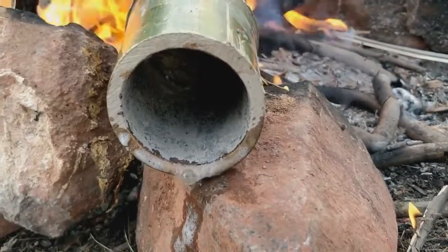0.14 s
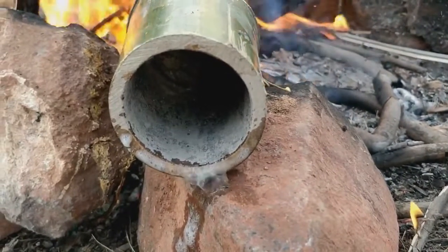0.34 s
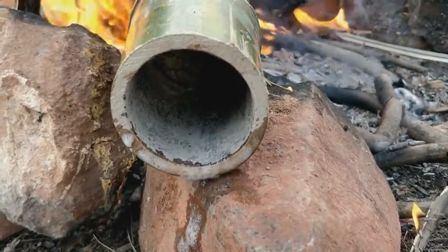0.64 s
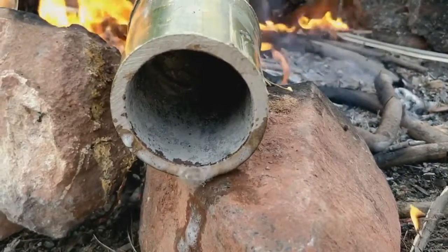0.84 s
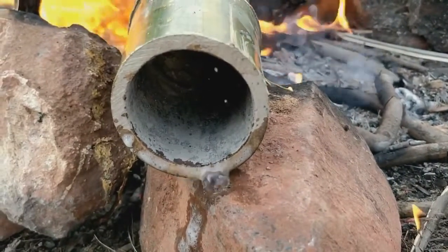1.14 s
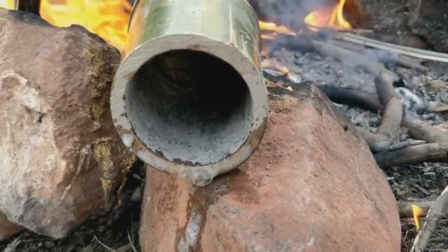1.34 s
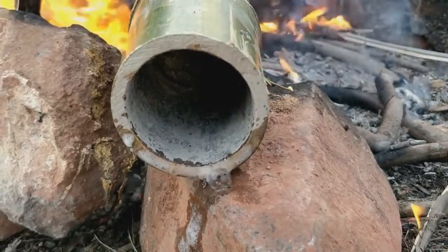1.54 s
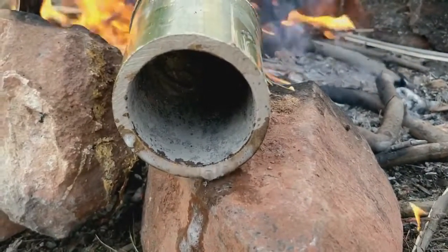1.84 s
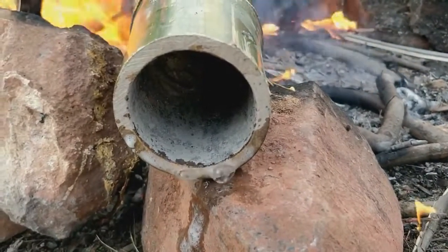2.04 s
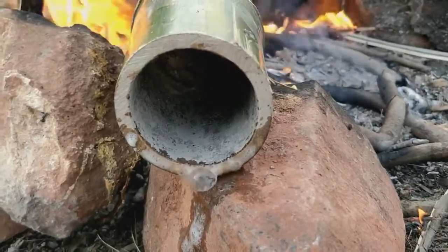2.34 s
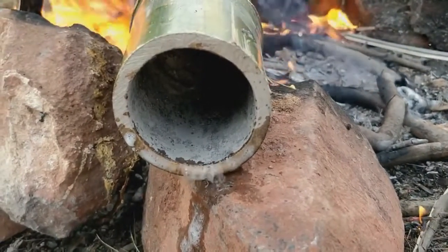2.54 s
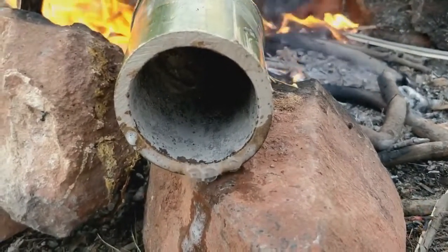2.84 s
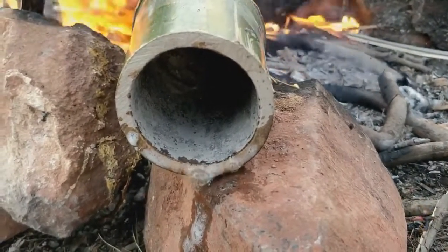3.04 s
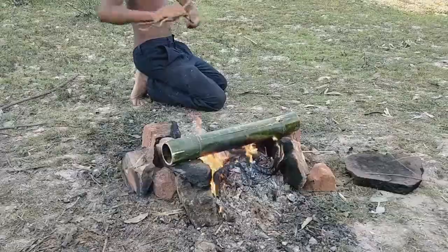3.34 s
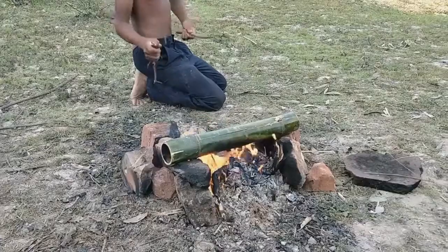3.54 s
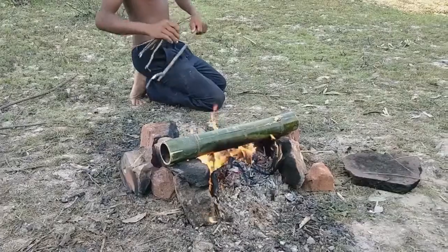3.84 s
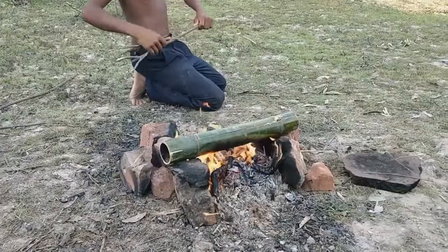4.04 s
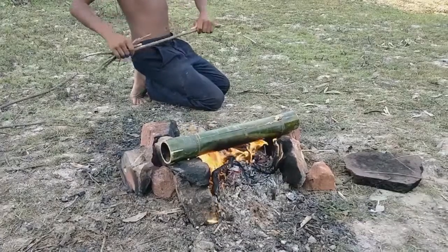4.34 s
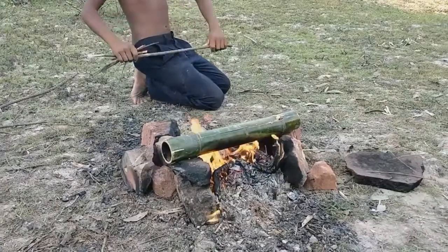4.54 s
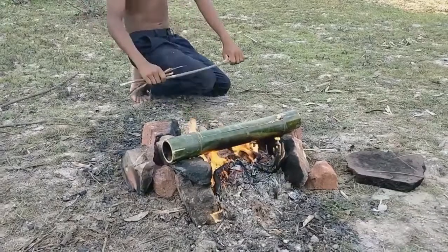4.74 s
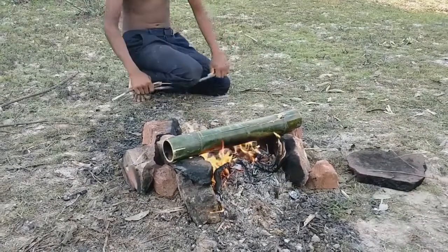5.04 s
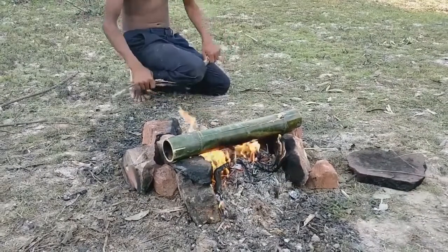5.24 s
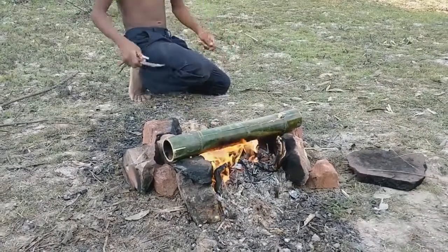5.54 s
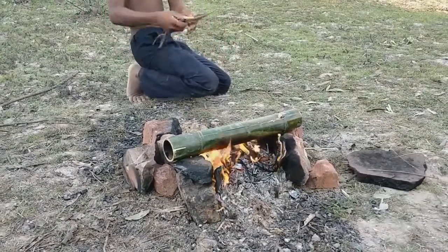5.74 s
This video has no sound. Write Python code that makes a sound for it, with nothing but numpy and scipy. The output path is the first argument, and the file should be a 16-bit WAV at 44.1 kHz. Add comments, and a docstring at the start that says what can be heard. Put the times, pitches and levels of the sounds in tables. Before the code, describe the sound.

A wet tube hisses steadily over a fluttering wood fire; after a tiny silence, faint hiss, wind bumps and crisp stick cracks outdoors.

```python
"""A green bamboo tube lies across a wood fire outdoors. At first we are close to its mouth: steam hisses out as
smooth coloured noise, flames flutter as dense random puffs and sap sizzles as tiny bursts, spitting twice. A
light breeze slowly picks up. After a very short silence the scene changes and the fire is heard from a few
steps away: a faint hiss and a low drone, with gusts and dull bumps of wind on the microphone. Dry sticks are
snapped for fuel, each crack a quick burst of noise with a ring, a woody tone and a tail of echoes; bark rustles
beside them."""
import sys
import numpy as np
from scipy import signal
from scipy.fft import rfft, irfft, next_fast_len
from scipy.io import wavfile
from scipy.ndimage import uniform_filter1d

SR = 44100
rng = np.random.default_rng(int(sys.argv[2]) if len(sys.argv) > 2 else 0)


def to_wav(sig):
    """Store sig (one row per channel, or 1-D mono) as 16-bit WAV at the path in sys.argv[1].

    Samples outside -1..1 are clipped; the rate is SR.
    """
    pcm = np.clip(np.atleast_2d(sig), -1, 1) * 32767
    pcm = np.round(pcm).astype(np.int16)
    wavfile.write(sys.argv[1], SR, pcm.T)  # frames by channels


N = 259735
TIME = np.arange(N) / SR
SIZE = next_fast_len(N)
FREQ = np.maximum(np.fft.rfftfreq(SIZE, 1 / SR), 1)  # never 0, so its logarithm exists


# resonances of the steam hiss, levels relative to each other:
# centre_hz, width_hz, level_db, left_over_right_db, left_lead_radians, left_right_likeness (0-1)
STEAM_RESONANCES = [(2280, 3280, -14.6, 0.4, -2.3, 0.5), (2700, 520, -11.3, -7.5, -0.6, 0.35),
                    (3920, 450, -6.2, -2.3, -2.5, 0.41), (4600, 650, 0.0, 0.0, 3.1, 0.99),
                    (5640, 710, -1.5, 0.9, 2.9, 0.99), (6150, 800, -6.7, -6.7, 0.6, 0.7),
                    (7590, 1030, -6.6, -0.5, 2.5, 0.26), (9000, 930, -10.3, -0.8, 0.2, 0.99),
                    (10090, 1550, -7.3, 6.9, -0.8, 0.27), (11120, 540, -9.0, 18.3, -3.0, 0.29),
                    (12390, 1760, -10.8, 3.3, -0.7, 0.03), (14800, 1760, -13.0, -2.3, 3.5, 0.03)]
# narrow dips in the hiss: centre_hz, width_hz
STEAM_DIPS = [(5046, 270), (7125, 235), (8320, 265)]
# bands where the left and right noise are set in opposite phase: centre_hz, width_hz, share (0-1)
OPPOSITE_PHASE_BANDS = [(3310, 280, 0.96), (4850, 1360, 1)]
# the flow of steam wavers: time_s, level_change_db, extra_change_of_the_sharp_edge_db
STEAM_FLOW = [(0.0, -0.5, -0.5), (0.36, 0.5, -2.5), (0.42, -3, -2), (0.47, -0.5, -2), (0.63, -0.3, 1),
              (1.1, 0, -0.5), (1.17, 0, -6), (1.25, 0.5, -1), (1.63, 0, -2), (1.72, 0.3, 0),
              (2.2, 1.5, 0.5), (2.3, 0.5, -4), (2.52, -0.5, -2.5), (2.65, 0.5, -1.5), (3.15, -0.5, 3)]


def steam(level_db=-34.0, edge_hz=(6700, 8900)):
    """The jet of vapour is smooth noise coloured by broad resonances, each with its own left-right balance."""
    columns = np.array(STEAM_RESONANCES).T[:, :, None]
    hz, width_hz, band_db, pan_db, lead, alike = columns
    power = from_db(band_db) ** 2 / (1 + ((FREQ - hz) / width_hz) ** 2 / np.e) ** 8
    for dip_hz, dip_width_hz in STEAM_DIPS:
        power = power * (1 - .97 / (1 + (2 * (FREQ - dip_hz) / dip_width_hz) ** 2))
    left = np.sqrt((power * from_db(pan_db)).sum(0))
    right = np.sqrt((power * from_db(-pan_db)).sum(0))
    # the angle of the likeness holds the lead of the left ear
    likeness = (power * alike * np.exp(-1j * lead)).sum(0) / (left * right + 1e-20)
    for centre_hz, span_hz, share in OPPOSITE_PHASE_BANDS:
        opposed = np.clip(share, 0, 1) / (1 + (2 * (FREQ - centre_hz) / span_hz) ** 16)
        likeness = likeness * (1 - opposed) - opposed
        # these bands are also set more equally loud on both sides
        left, right = left + opposed * (right - left) / 2, right + opposed * (left - right) / 2
    flow_db, edge_db = in_time(STEAM_FLOW)
    flicker_db = .5 * drift(25)
    hiss = mottled(stereo_noise(left, right, likeness), patchy_db=3.2, patch_hz=220)
    return from_db(level_db + flow_db + flicker_db) * lifted(hiss, edge_hz, "band", edge_db)


def mottled(x, patchy_db, patch_hz, size=1024):
    """Make a sound flicker in narrow, short-lived patches of the spectrum."""
    _, _, spectra = signal.stft(x, nperseg=size)
    rough = rng.standard_normal(spectra.shape[1:])
    bins = max(1, round(patch_hz * size / SR))
    patches = rms_one(uniform_filter1d(rough, bins, axis=0))
    _, patched = signal.istft(spectra * from_db(patchy_db * patches), nperseg=size)
    return rms_one(patched[:, :N])


# how hard the fire burns: time_s, flutter_level_db (before the trim in flames)
FLAME = [(0.0, -45.5), (0.2, -49.5), (0.3, -39.5), (0.345, -59), (0.48, -58), (0.56, -43), (0.64, -49.5),
         (0.74, -47), (1.05, -46), (1.27, -41.5), (1.38, -46.5), (1.58, -47), (1.655, -38), (1.74, -52.5),
         (2.07, -48), (2.15, -40.5), (2.24, -49), (2.52, -43.5), (2.68, -39.5), (2.76, -47.5),
         (3.23, -46.5)]
# the strongest flares: time_s, flutter_peak_db, low_thump_peak_db (both before the trims in flames)
FLARES = [(0.028, -32, -46), (0.123, -31.5, -40), (0.301, -30.5, -39), (0.745, -33, -47),
          (0.83, -27.5, -51), (0.895, -30, -45), (0.931, -30.5, -42), (1.108, -31.5, -37),
          (1.232, -36, -32), (1.274, -28.5, -36), (1.431, -29, -44), (1.494, -26.5, -49), (1.542, -29, -54),
          (1.771, -31.5, -36.5), (1.836, -32, -49), (1.921, -31.5, -49), (2.014, -27.5, -45),
          (2.68, -28.5, -42), (2.769, -33, -34), (2.875, -33, -55), (3.07, -58, -28)]
# colour of the low roar: pitch_hz, relative_level_db (per Hz)
ROAR = [(30, -3), (70, -6), (130, -1), (330, -2.5), (420, -4.5), (600, -27), (2500, -62)]
# colour of the flutter: pitch_hz, relative_level_db (per Hz)
FLUTTER = [(150, -14.5), (280, -3.5), (390, 0), (560, -3), (740, -3), (950, -7), (1150, -15), (4500, -54)]


def flames(flutter_trim_db=2.0, flare_trim_db=-6.0, thump_trim_db=-1.5, roar_db=-45.0, roar_follows=0.17,
           roar_swing_db=3.0, flutter_swing_db=4.0, brightens=.3, bright_hz=750, lag_s=.0001):
    """Burning gas makes a low roar and a dense flutter that tears off for moments, leaps with each flare
    and brightens as it grows."""
    vigour_db, = in_time(FLAME)
    surge_db = vigour_db - vigour_db.mean()
    s, peaks_db, thumps_db = np.transpose(FLARES)
    turbulence = drift(24.3)
    low_db = roar_db + roar_follows * surge_db + roar_swing_db * turbulence
    low_power = from_db(low_db) ** 2 + swells(s, thumps_db + thump_trim_db, rises_s=0.006)
    # the cap lets the flutter fall further than it rises
    mid_db = vigour_db + flutter_trim_db + flutter_swing_db * np.minimum(turbulence, .5)
    mid_power = from_db(mid_db) ** 2 + swells(s, peaks_db + flare_trim_db, rises_s=0.0053)
    flutter = puffs(FLUTTER, per_s=4000, spread_db=0)
    flutter = lifted(flutter, bright_hz, "high", brightens * surge_db)
    roar = puffs(ROAR, per_s=1200, spread_db=3.0)
    fire = np.sqrt(low_power) * roar + np.sqrt(mid_power) * flutter
    # the fire lies a little to the left, so the right ear hears it later
    later = np.interp(TIME - lag_s, TIME, fire)
    return panned(1.8) * np.array([fire, later])


# sap spits on the hot wall of the tube: time_s, peak_db, swell_s
SPITS = [(1.222, -48, 0.026), (2.145, -46.5, 0.02)]
# colour of the sizzle: pitch_hz, relative_level_db (per Hz)
SIZZLE = [(800, -17), (1400, 2), (2700, 4.5), (4300, -42)]


def sizzle(steady_db=-56):
    """Tiny blisters of sap burst all the time, and far harder when it spits."""
    power = from_db(steady_db) ** 2 + swells(*np.transpose(SPITS))
    return np.sqrt(power) * puffs(SIZZLE, per_s=700, spread_db=6.0)


# cracks of dry wood: time_s, peak_db (before the trim in cracks), ring_hz, ring_db, brightness_db,
# time_to_fall_60_db_s, woody_tone_hz, woody_tone_db, scattered_tail_db
CRACKS = [(3.362, -24, 4170, -7, 7, 0.018, 1760, -23, -22), (3.4010, -7, 4200, -7, -1, .007, 330, -17, -22),
          (3.4031, -10, 3000, -3, -5, 0.008, 1760, -18, -22),
          (3.4132, -21, 10400, 3, 7, 0.017, 3400, -11, -17),
          (3.419, -15, 10440, 3, -8, 0.009, 510, -10, -22), (3.4217, -29, 3370, -8, -4, 0.037, 300, 1, -24),
          (4.0478, -33.5, 1900, -2, -24, 0.03, 4060, -3, -7),
          (5.104, -38.5, 3240, -10, 5, 0.1, 2900, -20, -16),
          (5.2848, -7, 7560, -8, 0, 0.009, 770, -17, -14), (5.2863, -6, 8200, -8, 2, 0.007, 360, -19, -14),
          (5.291, -26, 4400, -13, 15, 0.03, 1750, -8, -16),
          (5.303, -15, 10400, -12, 4, 0.027, 1770, -16, -9),
          (5.3182, -15.5, 3400, -2.5, 4, 0.021, 2350, -17, -16),
          (5.3333, -34, 550, 4, -6, 0.019, 530, 4.5, -8),
          (5.856, -42.5, 1690, -4, -18, 0.069, 1220, -2, -16)]
# colour of splitting wood, also used by the rustles: pitch_hz, relative_level_db (per Hz)
WOOD = [(120, -20), (400, -5), (750, -9), (1200, -6), (2500, -2), (4000, 1.5), (5300, 0), (8000, 4),
        (12000, 4), (15500, -12)]
# far sounds favour the left ear in the treble, the far hiss too: pitch_hz, left_over_right_db
FAR_BALANCE = [(1200, 2.5), (2000, 0.5), (7000, -0.5), (9500, 5.5), (11500, 16.5), (14500, -2)]


def cracks(ring_width_hz=800, bright_hz=5000, ragged_db=2.0, likeness=0.59, trim_db=-8.0, build_share=0.038,
           body_t60_s=0.021, size=8192):
    """Each crack is a volley of tearing fibres that builds, dies quickly and rings one resonance of the stick."""
    direct, outward = np.zeros((2, 2, N + size))
    age = np.arange(size) / SR
    hz = np.maximum(np.fft.rfftfreq(size, 1 / SR), 1)
    alike, ears = np.clip(likeness, 0, 1), panned(at_hz(FAR_BALANCE, hz))
    for s, peak_db, ring_hz, ring_db, bright_db, t60_s, body_hz, body_db, tail_db in CRACKS:
        ragged = from_db(ragged_db * rng.standard_normal(size))
        mid, side = rng.standard_normal((2, size)) * ragged
        both = np.sqrt(1 + alike) * mid + np.sqrt(1 - alike) * side * [[1], [-1]]
        fibres = ears * rfft(both)
        colour_db = at_hz(WOOD, hz) + bright_db / (1 + (bright_hz / hz) ** 4)
        tear = irfft(fibres * from_db(colour_db))
        ring = irfft(fibres / (1 + (2 * (hz - ring_hz) / ring_width_hz) ** 2))
        # longer volleys also take longer to build
        build = 1 - np.exp(-(age / (build_share * t60_s)) ** 2)
        shape = build * from_db(-60 * age / t60_s)
        volley = rms_one(rms_one(tear * shape) + from_db(ring_db) * rms_one(ring * shape))
        volley = volley * np.sqrt(np.mean(shape ** 2)) / shape.max()
        # the released piece bends back and forth with a brief woody tone
        body = from_db(body_db - 60 * age / body_t60_s) * np.sin(2 * np.pi * body_hz * age)
        crack = from_db(peak_db + trim_db) * (volley + body)
        start = round(s * SR)
        direct[:, start:start + size] += crack
        outward[:, start:start + size] += from_db(tail_db) * crack
    return direct[:, :N] + clearing(outward[:, :N])


def clearing(x, dull_hz=8000, build_s=0.00089, echoes_per_s=700, diffuse=0.12, t60_s=.23):
    """Ground and bushes scatter a short, duller tail of many separate echoes."""
    age = TIME[:SR // 2]
    echoes = diffuse + (rng.random((2, len(age))) < echoes_per_s / SR)
    fade = from_db(-60 * age / t60_s) * (1 - np.exp(-age / build_s))
    scatter = echoes * rng.standard_normal((2, len(age))) * fade
    dulling = signal.butter(1, min(dull_hz, .45 * SR), fs=SR, output="sos")
    scatter = signal.sosfilt(dulling, scatter)
    scatter /= np.sqrt(np.sum(scatter ** 2, axis=1, keepdims=True))
    return signal.fftconvolve(x, scatter, axes=1)[:, :N]


# bark and splinters rub as a stick is bent: time_s, peak_db, swell_s
RUSTLES = [(3.349, -48, 0.003), (4.035, -56.5, 0.02), (5.317, -46, 0.014), (5.83, -53.5, 0.011)]


def rustles(dull_hz=7000):
    """Rubbing bark and splinters make a fine crackle of random grains, different in each ear."""
    grains = np.array([puffs(WOOD, per_s=750, spread_db=5.0) for ear in range(2)])
    dulling = signal.butter(2, min(dull_hz, SR / 2 - 1), fs=SR, output="sos")
    dull = signal.sosfilt(dulling, grains)
    return np.sqrt(swells(*np.transpose(RUSTLES))) * rms_one(dull)


# the breeze at the microphone: time_s, level_db (before the trim in gusts), left_over_right_db
WIND = [(3.34, -50, 11), (3.42, -48, 4), (3.48, -51.5, 7), (3.76, -49, 11), (3.81, -48, -8),
        (4.08, -49.5, 18), (4.14, -53, 16), (4.9, -65, 8), (5.05, -57, 5), (5.27, -67.5, 7),
        (5.82, -51.5, -6), (5.88, -43, -23)]


def gusts(trim_db=3.5):
    """The breeze swells, drops and veers between the left and right ports of the microphone."""
    level_db, side_db = in_time(WIND)
    return panned(side_db) * wind(level_db + trim_db, lumps_db=3.5)


# colour of wind on the microphone: pitch_hz, relative_level_db (per Hz)
BUFFET = [(15, -4.5), (50, -2), (110, -2.5), (170, -10), (250, -21), (900, -71)]


def wind(level_db, lumps_db, eddies_hz=20):
    """Eddies buffet each microphone port: low noise, mostly separate, with its own uneven level at each port."""
    colour = from_db(at_hz(BUFFET))
    eddies = np.array([drift(eddies_hz), drift(eddies_hz)])
    ports = stereo_noise(colour, colour, likeness=.2)
    return from_db(level_db + lumps_db * eddies) * ports


# dull bumps on the microphone: time_s, peak_db (before the trim in bumps), pitch_hz, left_over_right_db
BUMPS = [(4.014, -37, 70, 17), (4.074, -28, 60.3, 20), (4.981, -33.5, 85.5, 18), (5.627, -32, 60, -22),
         (5.776, -29, 128, -22), (5.869, -23.5, 149, -30)]


def bumps(rise_s=0.0036, trim_db=-4.5):
    """A single large eddy pushes on a port: a heavily damped low swing."""
    age = TIME[:SR // 8]
    out = np.zeros((2, N + SR // 8))
    for s, peak_db, hz, pan_db in BUMPS:
        shape = age / rise_s * np.exp(1 - age / rise_s)
        swing = np.sin(2 * np.pi * (hz * age + rng.random())) * shape
        start = round(s * SR)
        out[:, start:start + len(age)] += from_db(peak_db + trim_db) * panned(pan_db) * swing
    return out[:, :N]


# colour of the distant hiss: pitch_hz, relative_level_db (per Hz)
FAR_HISS = [(150, -12), (300, -2), (500, -7.5), (1300, -15), (2000, -6), (2700, -6.5), (4500, -8),
            (5800, -6), (8800, -10), (11500, -3), (13000, -4.5), (15500, -17)]
# how alike the distant hiss is in the two ears: pitch_hz, left_right_likeness (0-1)
FAR_LIKENESS = [(400, 0.98), (1100, 0.28), (2000, 0.74), (3250, 0.32), (4000, 0.057), (7800, 0.025),
                (12500, .3)]


def far_hiss(level_db=-53.5, flicker_db=1.25):
    """The steaming tube and the open air from a few steps away: faint coloured noise with a flickering level."""
    left, right = from_db(at_hz(FAR_HISS)) * panned(at_hz(FAR_BALANCE))
    likeness = np.clip(at_hz(FAR_LIKENESS), -1, 1)
    return from_db(level_db + flicker_db * drift(21.0)) * stereo_noise(left, right, likeness)


def drone(hz=155, width_hz=22, level_db=-65):
    """A faint low drone hangs in the distance: noise kept to a narrow band."""
    colour = 1 / (1 + (2 * (FREQ - hz) / width_hz) ** 2)
    return from_db(level_db) * stereo_noise(colour, colour, likeness=0.67)


def from_db(db):
    """Turn decibels into gain."""
    return 10 ** (np.asarray(db) / 20)


def rms_one(x):
    """Scale to an rms (average strength) of 1."""
    return x / np.sqrt(np.mean(x ** 2) + 1e-20)


def in_time(rows):
    """Draw each column of a time table as a curve with a value at every sample."""
    s, *columns = np.transpose(rows)
    return [np.interp(TIME, s, column) for column in columns]


def at_hz(points, hz=FREQ):
    """Read a frequency table between its points, on a logarithmic frequency axis."""
    points = np.array(points)
    return np.interp(np.log(hz), np.log(points[:, 0]), points[:, 1])


def panned(db):
    """Left and right gains for a left-over-right level difference, at constant power."""
    gains = from_db(np.array([[.5], [-.5]]) * db)
    return gains / np.sqrt(np.mean(gains ** 2, axis=0))


def drift(rate_hz):
    """Smoothed noise that wanders around 0 with a spread near 1; a higher rate wanders faster."""
    step = 40  # samples between drawn values
    r = np.exp(-2 * np.pi * rate_hz * step / SR)
    draws = rng.standard_normal(N // step + 2002)
    slow = signal.lfilter([1], [1, -2 * r, r * r], draws)[2000:]  # skip the filter's start-up
    return np.interp(np.arange(N) / step, np.arange(len(slow)), rms_one(slow))


def stereo_noise(left, right, likeness):
    """Noise with a gain per frequency at each ear and a (complex) likeness between them; rms 1."""
    shared, own = rfft(rng.standard_normal((2, SIZE)))
    apart = np.sqrt(np.maximum(1 - np.abs(likeness) ** 2, 0))
    right_ear = right * (likeness * shared + apart * own)
    return rms_one(irfft([left * shared, right_ear], SIZE)[:, :N])


def puffs(colour, per_s, spread_db):
    """Random pressure pulses of either sign, sized by spread_db and rounded to a colour; rms 1."""
    happens = rng.random(N) < per_s / SR
    sign = rng.choice([-1, 1], N)
    loudness = from_db(spread_db * np.clip(rng.standard_normal(N), -2, 2))
    spectrum = rfft(happens * sign * loudness, SIZE) * from_db(at_hz(colour))
    return rms_one(irfft(spectrum, SIZE)[:N])


def lifted(x, edges_hz, kind, db):
    """Raise or lower one part of the spectrum by a level that changes in time."""
    sos = signal.butter(1, np.minimum(edges_hz, SR / 2 - 1), kind, fs=SR, output="sos")
    return x + (from_db(db) - 1) * signal.sosfilt(sos, x)


def swells(times_s, peaks_db, rises_s):
    """Power of short surges: each swells quickly and dies more slowly."""
    power = np.zeros(N)
    for s, peak_db, rise_s in np.broadcast(times_s, peaks_db, rises_s):
        near = slice(int(s * SR), int(s * SR) + SR // 2)
        age = np.maximum(TIME[near] - s, 0) / rise_s
        power[near] += (from_db(peak_db) * age * np.exp(1 - age)) ** 2
    return power


def scene(close_end_s=3.243, far_start_s=3.327):
    """First at the mouth of the tube, then, after a brief silence, the scene changes to a few steps back."""
    close = np.exp(-np.maximum(TIME - close_end_s, 0) / 0.0036)  # quick fade out
    far = np.clip((TIME - far_start_s) / .06, 0, 1)  # fade in over 0.06 s
    breeze = wind(level_db=-58 + 3 * TIME, lumps_db=0.0)  # grows by 3 dB a second
    at_tube = steam() + sizzle() + flames() + breeze
    stepped_back = far_hiss() + drone() + gusts() + bumps()
    return close * at_tube + far * stepped_back + cracks() + rustles()


def record(dry, cutoff_hz=15500):
    """Cut the top of the spectrum steeply with a low-pass filter."""
    sos = signal.ellip(10, .2, 80, cutoff_hz, fs=SR, output="sos")
    return signal.sosfilt(sos, dry)


dry = scene()
out = record(dry)
to_wav(out)
```